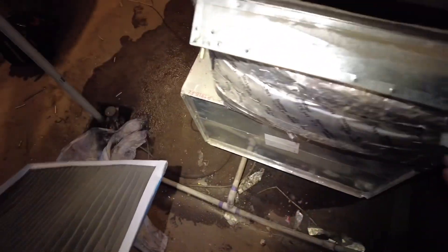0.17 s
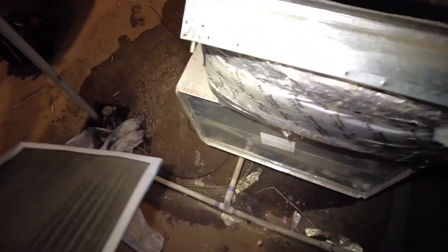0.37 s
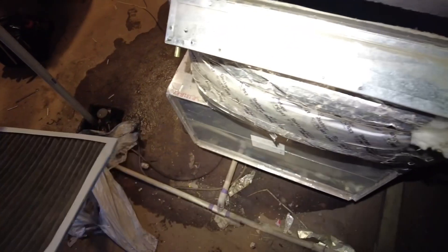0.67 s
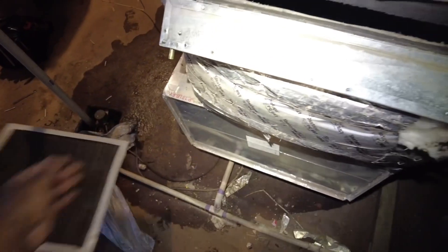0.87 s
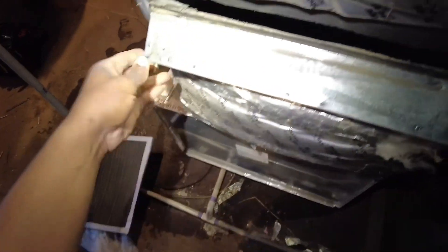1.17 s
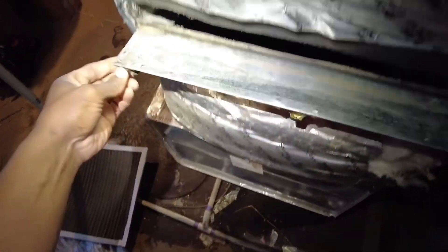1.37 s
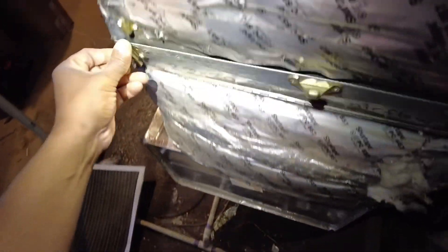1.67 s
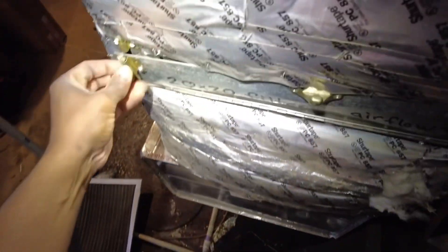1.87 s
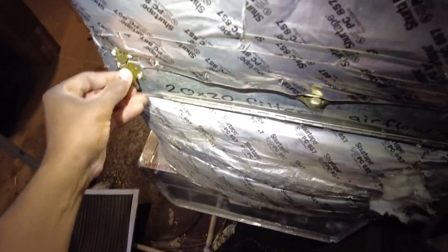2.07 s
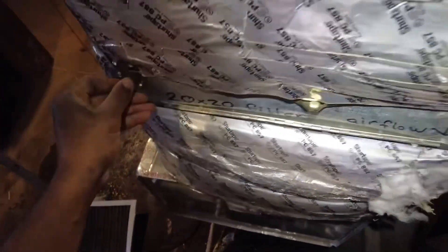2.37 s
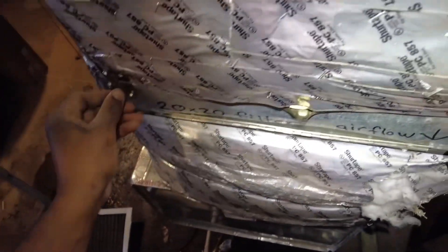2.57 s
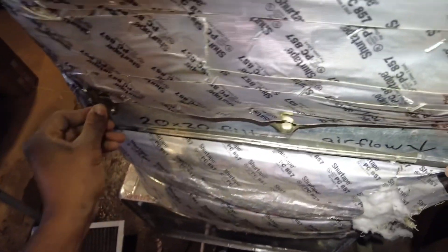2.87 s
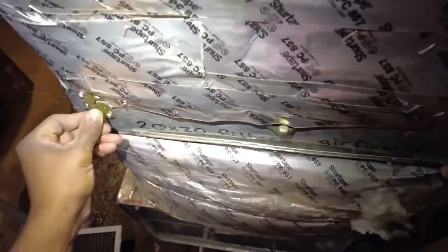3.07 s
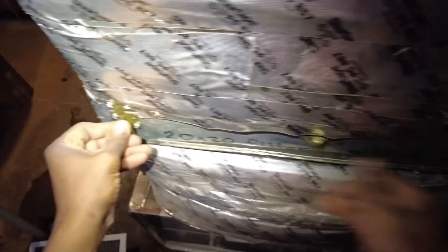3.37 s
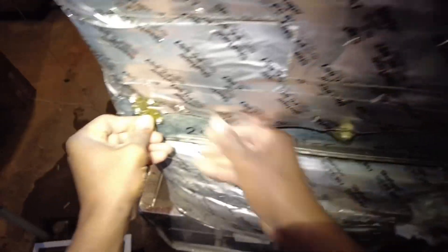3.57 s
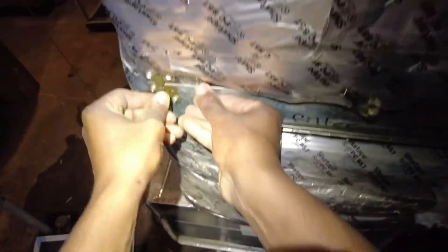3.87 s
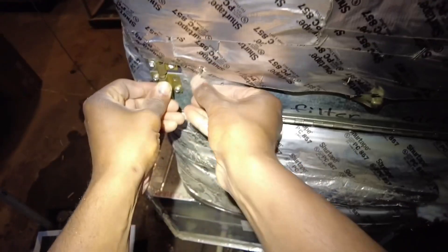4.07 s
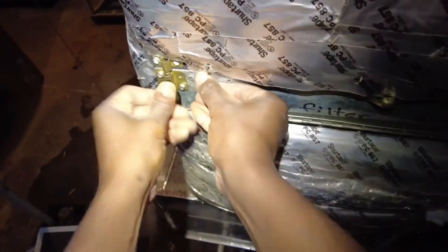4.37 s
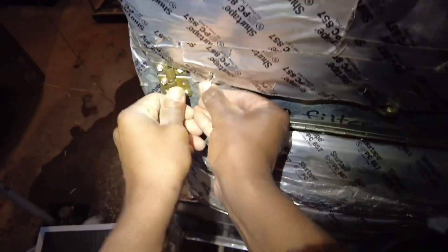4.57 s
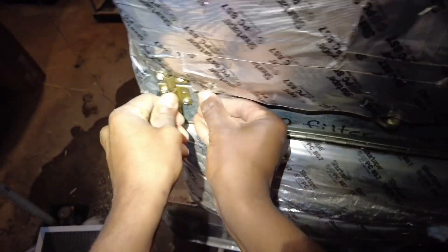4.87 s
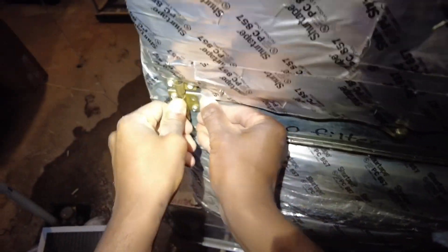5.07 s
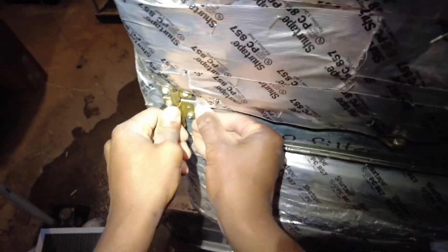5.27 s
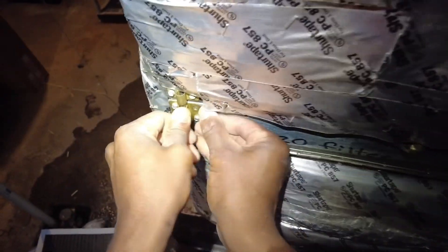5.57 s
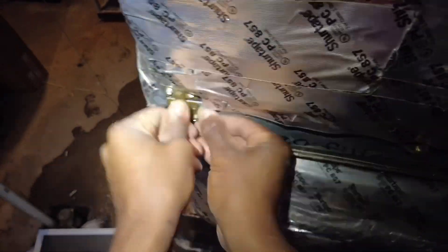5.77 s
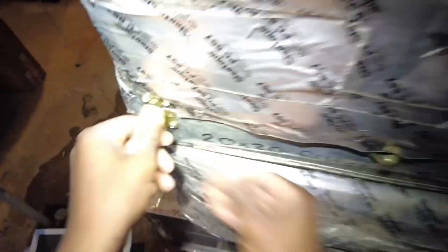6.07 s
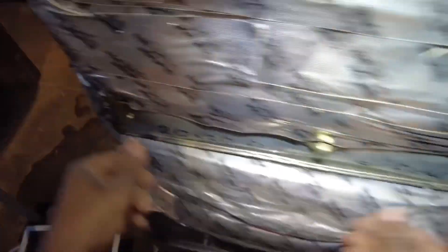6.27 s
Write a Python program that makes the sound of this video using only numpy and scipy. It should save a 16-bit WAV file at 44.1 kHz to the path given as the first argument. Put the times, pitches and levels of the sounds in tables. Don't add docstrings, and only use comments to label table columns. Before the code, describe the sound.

Close stereo pickup beside an air handler under a house: steady low cabinet drone with ground rumble and a resonant air rush. Thin metal clatters in quick clusters as the door swings, bounces and shuts, and the rush drops away to soft leakage. Then sparse finger rubs, foil crackles and light clicks, a short rough squeak, two hollow panel thumps, and finally a hard bright latch snap with the blower continuing.

```python
import sys
import numpy as np
from scipy import signal
from scipy.fft import rfft, irfft, next_fast_len
from scipy.io import wavfile
from scipy.ndimage import uniform_filter1d, map_coordinates

SR = 44100
rng = np.random.default_rng(int(sys.argv[2]) if len(sys.argv) > 2 else 0)


def unload_audio(sound):
    columns = np.transpose(np.atleast_2d(sound))
    steps = np.round(np.clip(columns, -1, 1) * 32767)
    wavfile.write(sys.argv[1], SR, steps.astype(np.int16))


def gain_from_decibels(decibels):
    exponent = np.asarray(decibels, float) / 20
    return 10 ** exponent


N = 282681

# start_s, share_shut (0 to 1)
DOOR_TRAVEL = [
    (1.2, 0.0),
    (1.34, .3),
    (1.6, 0.53),
    (1.68, 0),
    (1.79, 0.39),
    (1.95, 0.79),
    (2.05, .9),
    (2.3, 0.98),
]
# mode_hz, width_hz
DOOR_MODES = [(1510, 140), (2240, 100), (2990, 250), (4090, 90), (4410, 130), (4970, 82), (6240, 220),
              (7270, 100), (8050, 88), (9240, 120), (11300, 220)]


def unit(x):
    return x / np.sqrt(np.mean(x ** 2) + 1e-20)


def along(points, hz):
    f, v = np.transpose(points)
    return np.interp(np.log(hz + 1), np.log(f + 1), v)


def law(points, control):
    return np.interp(control, *np.transpose(points))


def curves(rows, silent=None):
    s, *cols = np.transpose(rows)
    return [np.interp(np.arange(N) / SR, s, c, silent, silent) for c in cols]


def wobble(rate):
    knots = rng.standard_normal(int(N * rate / SR) + 4)
    return map_coordinates(knots, [np.arange(N) * rate / SR])


def filtered(x, response):
    m = next_fast_len(x.shape[-1] + 8192)
    return irfft(rfft(x, m) * response(np.fft.rfftfreq(m, 1 / SR)), m)[..., :x.shape[-1]]


def band(f, hz, width_hz):
    return 1j * f * width_hz / (hz * hz - f * f + 1j * f * width_hz)


def lagged(x, lag_s):
    return filtered(x, lambda hz: np.exp(1j * np.pi * np.outer([1, -1], hz) * lag_s))


def rush(spectrum, patchy_db, peaks=(), grain_db=0, spread=1):
    # band_hz, likeness (0 to 1)
    port_likeness = [(60, 0.97), (150, 0.99), (380, 0.76), (1000, 0.25), (1500, 0.8), (2600, 0.28),
                     (5980, 0.051), (15000, 0.13)]
    grains = rng.standard_normal((2, N)) * gain_from_decibels(grain_db * wobble(900))
    z = signal.stft(grains, nperseg=512)[2]
    field = uniform_filter1d(rng.standard_normal(z.shape[1:]), size=6, axis=0)
    field = uniform_filter1d(field, size=10, axis=1)
    pair = signal.istft(z * gain_from_decibels(patchy_db * unit(field)), nperseg=512)[1][:, :N]

    def response(hz):
        turn = spread * np.arccos(np.clip(along(port_likeness, hz), -1, 1)) / 2
        humps_db = sum(db / (1 + (2 * (hz - c) / w) ** 2) for c, w, db in peaks)
        return gain_from_decibels(along(spectrum, hz) + humps_db) * [np.cos(turn), np.sin(turn)]

    mid, side = filtered(pair, response)
    return unit(np.array([mid + side, mid - side]))


def contacts():
    # start_s, peak_db, ring_hz, brightness_db
    door_rattles = [(0.5174, -42, 3190, -38), (0.519, -45, 4300, -36), (0.595, -42, 1550, -20),
                    (0.62, -36.5, 5200, -25), (0.7971, -35, 4700, -29), (0.798, -40, 1550, -30),
                    (0.8616, -29, 4900, -24), (0.9393, -26, 5000, -24), (0.9407, -30, 1780, -26),
                    (0.9412, -33, 2900, -30), (1.069, -46, 6500, -8), (1.1143, -42, 7000, -10),
                    (1.1196, -22, 3450, -34), (1.1235, -31, 2000, -30), (1.1783, -23, 3020, -34),
                    (1.1785, -27, 6400, -24), (1.181, -27, 4400, -30), (1.192, -33, 3000, -30),
                    (1.2895, -38.5, 2580, -22), (1.315, -36, 1500, -26), (1.3308, -32, 5280, -16),
                    (1.3438, -30, 5590, -18), (1.349, -34, 5800, -16), (1.3655, -27, 4500, -13),
                    (1.372, -31, 4300, -10), (1.4187, -28, 4250, -10), (1.4508, -31, 7300, -9),
                    (1.5102, -37, 3060, -20), (1.5292, -27, 4500, -9), (1.5333, -18, 3200, -9),
                    (1.537, -25, 8500, -6), (1.5385, -24, 4400, -20), (1.545, -30, 1550, -30),
                    (1.5828, -23, 4190, -14), (1.594, -30, 2900, -24), (1.6044, -29, 2900, -14),
                    (1.612, -35, 4300, -20), (1.7079, -41, 4050, -30), (1.7207, -24, 3980, -23),
                    (1.7405, -28.5, 6000, -25), (1.821, -47, 6500, -16), (1.85, -50, 9500, -8),
                    (1.924, -46, 5700, -18), (1.938, -39.5, 4500, -25)]
    # start_s, peak_db, brightness_db
    foil_crinkles = [(2.2456, -51, -21), (2.329, -51, -21), (2.39, -50, -21), (2.5519, -57.5, -35),
                     (2.7556, -46, -20), (2.7853, -45, -21), (2.906, -55, -30), (3.55, -48, -15),
                     (3.5594, -60, -20), (3.6379, -49.5, -21), (4.2797, -51, -20), (4.353, -47, -12),
                     (5.465, -44, -20), (6.1097, -55, -29), (6.2046, -44, -13), (6.2383, -48, -7),
                     (6.3494, -50.5, -5)]
    # start_s, peak_db, ring_hz, brightness_db
    nail_taps = [(2.1738, -41, 4600, -8), (2.175, -47.5, 1670, -28), (3.068, -37, 2590, -32),
                 (3.0682, -44, 1090, -30), (3.0684, -50, 7800, -24), (3.0686, -50, 5700, -30),
                 (2.907, -48, 2500, -30), (3.15, -45, 2900, -50), (3.1743, -48, 1900, -44),
                 (3.1994, -29, 3550, -16), (3.2005, -32, 7400, -10), (3.274, -49, 2600, -40),
                 (4.393, -36.5, 3600, -24), (4.4575, -40, 4300, -30), (4.464, -38, 4200, -30),
                 (4.4645, -42, 1300, -30), (4.4724, -34, 3520, -13), (4.477, -42, 9000, -10),
                 (4.6, -37.5, 2640, -14), (4.6145, -35, 3230, -16), (4.638, -40, 2600, -50),
                 (4.639, -47, 1200, -50), (4.6956, -43, 10800, -24), (4.7226, -30.5, 2830, -13),
                 (4.723, -35, 1600, -24), (4.7245, -42, 1150, -30), (4.7235, -40, 11000, -10),
                 (4.724, -34, 4270, -12), (4.9352, -38, 2750, -20), (4.9372, -36, 5500, -18),
                 (4.943, -42, 4300, -18), (4.94, -42, 1250, -30), (4.955, -47, 1300, -30),
                 (4.974, -46, 4000, -16), (4.731, -44, 4200, -16), (5.8225, -31, 5000, -10),
                 (5.838, -38, 6000, -14), (5.459, -49, 3500, -16), (5.364, -50, 9000, -14)]
    first_blow = [6.1, 1.3, 5.6]
    # level_db of ring, fizz, body
    scatter_db = [
        [-1.5],
        [-2],
        [-8],
    ]

    crinkle_hz = 2900
    ticks = [(*row, -7.5 - 0.44 * (row[1] + 30), 0.036) for row in door_rattles]
    ticks += [(s, db, crinkle_hz, bright_db, -8, 0.035) for s, db, bright_db in foil_crinkles]
    ticks += [(*row, -5 - 9.5 * np.log2(row[2] / crinkle_hz), 0.019) for row in nail_taps]

    size = 4096
    out, t, f = np.zeros((2, N + SR)), np.arange(size) / SR, np.fft.rfftfreq(size, 1 / SR)
    fizz, middle = band(f, 11500, 9000) ** 2, band(f, 5340, 5100) ** 2
    body = band(f, 1524, 990) ** 2 + 0.84 * band(f, 995, 520) ** 2
    modes_hz, widths_hz = np.transpose(DOOR_MODES)[..., None]
    for s, db, ring_hz, bright_db, body_db, t60_s in ticks:
        envelope = gain_from_decibels(-60 * t / np.clip(t60_s, .005, .06)) * (1 - np.exp(-t / 0.00069))
        burst = rng.standard_normal((2, 3, size)) * envelope
        burst[0, :, 8] += first_blow
        reach_db = -3 - 11 * np.abs(np.log2(modes_hz / ring_hz)) + rng.normal(0, 3, modes_hz.shape)
        ring = band(f, ring_hz, 0.35 * ring_hz) ** 2
        ring = ring + (gain_from_decibels(reach_db) * band(f, modes_hz, widths_hz)).sum(axis=0)
        ring = ring + gain_from_decibels(0.59 * bright_db - 3) * middle
        colours = irfft(rfft(burst) * [ring, fizz, body], size)
        levels = gain_from_decibels([db - 1, db - 2 + bright_db, db - 2.5 + body_db]) / np.abs(colours).max(axis=(0, 2))
        colours[1] *= gain_from_decibels(scatter_db)
        out[:, round(s * SR):][:, :size] += levels @ colours
    return out[:, :N]


def thuds():
    # start_s, peak_db, pitch_hz, t60_s, way (out 1, in -1)
    knocks_and_pops = [(1.29, -32, 288, 0.096, 1), (1.533, -34.5, 270, 0.092, -1), (1.74, -41, 260, .08, 1),
                       (4.462, -38.5, 557, 0.064, 1), (4.5994, -13.5, 246.5, 0.065, 1),
                       (4.7265, -33, 487, 0.052, 1), (4.954, -33.5, 478, 0.052, 1), (4.622, -30, 300, .04, 1),
                       (4.934, -7, 249.4, 0.031, -1), (4.9345, -25, 560, .03, -1), (4.6, -30, 480, .03, 1),
                       (5.8096, -27, 247, .05, -1), (5.8152, -14, 268, 0.014, 1), (5.816, -39, 535, 0.075, 1),
                       (3.068, -40, 596, 0.033, 1), (6.205, -40.5, 700, 0.028, 1)]
    out, t = np.zeros(N + SR), np.arange(SR // 4) / SR
    for s, db, hz, t60_s, way in knocks_and_pops:
        over_db = np.interp(t60_s, [0.036, .066], [-2.5, -10])
        low = np.sin(2 * np.pi * hz * t) * gain_from_decibels(-60 * t / t60_s)
        overtones = np.sin(2 * np.pi * 1.51 * hz * t) + .25 * np.sin(2 * np.pi * 2.26 * hz * t)
        high = gain_from_decibels(over_db - 60 * t / (0.71 * t60_s)) * overtones
        soft_start = (1 - np.exp(-t / 0.0011)) ** 2
        out[round(s * SR):][:len(t)] += np.sign(way) * gain_from_decibels(db + 5) * (low + high) * soft_start
    return out[:N]


def squeak():
    # start_s, pitch_hz, level_db
    glide = [
        (4.432, 3950, -66),
        (4.445, 3720, -43),
        (4.455, 3560, -28.5),
        (4.464, 3500, -34),
        (4.47, 3560, -54),
        (4.5, 3550, -57),
        (4.53, 3550, -64),
        (4.56, 3550, -76),
    ]
    # multiple, level_db
    overtones = [(1, -1), (2, -12), (3, -19), (4, -24)]
    hz, db = curves(glide)
    turn = 2 * np.pi * np.cumsum(hz * (1 + .018 * wobble(500))) / SR
    sounding = curves(glide, silent=0)[0] > 0
    whistle = 0
    for k, level_db in overtones:
        softer_db = 1.2 * (k - 1) * np.minimum(db + 45, 0)
        whistle = whistle + gain_from_decibels(level_db + softer_db) * np.sin(k * turn)
    return sounding * gain_from_decibels(db + 1.8 * wobble(370)) * whistle


def snap():
    # start_s, peak_db
    release_s, peak_db = (5.8139, -5.5)
    # after_release_s, level_db
    tongue_blows = [
        (.00045, -2),
        (.00095, 0),
        (.0013, -7),
        (.0016, -9),
        (.0019, -9),
        (.0026, -13),
        (.004, -12),
    ]
    # centre_hz, width_hz, level_db
    brass_modes = [(1560, 220, 12), (2910, 650, 5), (4500, 1000, 7), (6100, 800, 1), (7900, 1400, -1),
                   (10200, 1900, 0), (12400, 1800, 1), (14800, 1800, 2)]
    out, t = np.zeros(N + SR), np.arange(SR // 8) / SR
    envelope = (1 - np.exp(-t / 0.00045)) / (1 + (t / 0.0033) ** 4)
    chatter = rng.standard_normal(len(t)) * envelope * gain_from_decibels(-17)
    for after_s, db in tongue_blows:
        chatter[round(after_s * SR)] -= gain_from_decibels(db)
    ring = filtered(chatter, lambda f: sum(gain_from_decibels(db) * band(f, hz, w) for hz, w, db in brass_modes))
    out[round(release_s * SR):][:len(t)] = gain_from_decibels(peak_db) * ring / np.abs(ring).max()
    return out[:N]


def fingers():
    # start_s, end_s, foil_rustle_db, panel_scrape_db
    strokes = [(0.486, 0.722, -69, -58), (1.49, 1.53, -55, -50), (1.118, 1.19, -44.5, -45),
               (1.14, 1.234, -41.5, -42), (1.28, 1.36, -55, -44), (1.315, 1.4, -49, -44.5),
               (1.36, 1.43, -54, -54), (1.41, 1.535, -53, -55), (1.574, 1.635, -46, -41.5),
               (1.716, 1.783, -50, -40.5), (1.9, 1.97, -71, -61), (2.17, 2.43, -67, -74),
               (3.53, 3.587, -67, -76), (3.588, 3.746, -62, -65), (3.707, 3.845, -61, -64),
               (3.81, 4.133, -70.5, -70.5), (4.26, 4.347, -65.5, -64), (4.594, 4.631, -54, -53),
               (6.053, 6.277, -65.5, -62.5)]
    # start_s, end_s, foil_rustle_db, panel_scrape_db
    skids = [
        (1.111, 1.19, -49, -44),
        (1.19, 1.36, -50, -58),
        (1.524, 1.59, -38.5, -40),
        (1.62, 1.74, -66, -64),
        (3.195, 3.275, -64, -62),
        (4.446, 4.52, -46, -50),
        (4.72, 4.79, -60, -62),
        (4.93, 5.06, -57, -54),
        (5.813, 5.95, -50, -43),
    ]
    # start_s, end_s, foil_rustle_db, panel_scrape_db
    pushes = [
        (1.04, 1.134, -58.5, -63),
        (2.94, 3.066, -70, -62),
        (5.775, 5.817, -59, -54),
    ]
    # band_hz, level_db per Hz
    foil_spectrum = [(2060, -29), (3500, -11), (6070, -1.5), (7370, -6.5), (7940, -2.5), (8560, -4.5),
                     (10500, -7.5), (15600, -13)]
    # band_hz, level_db per Hz
    panel_spectrum = [(400, -30), (600, -7.5), (1000, -9), (1200, -5.5), (1550, -3), (2300, -7), (3000, -5),
                      (3600, -7), (4400, -5), (6000, -9), (8000, -17), (12000, -45)]

    t, foil, panel = np.arange(N) / SR, np.zeros(N), np.zeros(N)
    kinds = [(strokes, 0.45, 1.3), (skids, 0.1, 2.3), (pushes, 0.87, 1.1)]
    for rows, rise, fade in kinds:
        for start, end, foil_db, panel_db in rows:
            crest = start + rise * (end - start)
            up, down = np.interp(t, [start, crest], [0, 1]), np.interp(t, [crest, end], [1, 0])
            swell = up * (2 - up) * down ** fade
            foil += gain_from_decibels(foil_db) * swell
            panel += gain_from_decibels(panel_db) * swell
    clumps, patchy_db = gain_from_decibels(1.2 * wobble(60) + 1.5 * wobble(220)), 2.2
    door_ring = [(hz, width_hz, 2.5) for hz, width_hz in DOOR_MODES]
    rustle = foil * rush(foil_spectrum, patchy_db, grain_db=2.0, spread=0.95)
    scrape = panel * rush(panel_spectrum, patchy_db, peaks=door_ring, grain_db=2.5, spread=0.83)
    return clumps * (rustle + scrape)


def air():
    # band_hz, level_db per Hz
    slot_spectrum = [(180, -28), (300, 3.5), (331, 5), (360, -13), (391, -11.5), (469, -0.5), (723, -12.5),
                     (812, -10), (990, -12), (1740, -16.5), (15800, -42)]
    # band_hz, level_db per Hz
    gap_spectrum = [(900, -43), (1150, -24), (1350, -4), (1550, -8), (1800, 2), (2050, -3.5), (2400, -12.5),
                    (2900, 0), (3150, -5.5), (3550, -19), (4200, -7), (5000, -18), (6000, -18.5),
                    (12000, -39)]
    # band_hz, level_db per Hz
    seam_spectrum = [(350, -46), (600, -3.5), (800, -5.5), (1050, -12), (1250, -15), (1700, -46)]
    # band_hz, level_db per Hz
    leak_spectrum = [(700, -62), (1050, -29), (1300, -18), (2300, -21), (3300, -22.5), (5000, -26.5),
                     (7800, -32), (9000, -29), (9800, -36.5), (13000, -38), (15000, -44)]
    # centre_hz, width_hz, level_db
    duct_modes = [(464, 57, 5), (813, 66, 8), (1274, 120, 6.5), (1710, 150, 2.5), (2920, 370, 4),
                  (4250, 170, 4), (6200, 280, 3.5)]
    # share_shut, level_db
    choke = [(0, 0), (.3, -.5), (.55, -4), (.8, -25), (1, -32)]
    # share_shut, level_db
    sing = [(0, -61), (.3, -49.5), (.8, -54), (.9, -67), (1, -85)]

    t, shut, patchy_db = np.arange(N) / SR, np.clip(curves(DOOR_TRAVEL)[0], 0, 1), 1.2
    nearest_s = 1.22
    near_db = -45 - np.maximum(4.5 * (nearest_s - t), 10.5 * (t - nearest_s))
    slot = gain_from_decibels(near_db + law(choke, shut)) * rush(slot_spectrum, patchy_db, peaks=duct_modes)
    gap = gain_from_decibels(law(sing, shut)) * rush(gap_spectrum, patchy_db)
    pressed = np.exp(-((t - 2.03) / .22) ** 2)
    seam_open_db, seam_shut_db = -61, -64
    seam_db = seam_open_db + shut * (seam_shut_db - seam_open_db) - 6.5 * pressed + 1.5 * wobble(2.48)
    seam = gain_from_decibels(seam_db) * rush(seam_spectrum, patchy_db)
    leaks = gain_from_decibels(-63.3 + 0.56 * wobble(4.13)) * rush(leak_spectrum, patchy_db, peaks=duct_modes[2:])
    return slot + gap + seam + leaks


def blower():
    # band_hz, level_db per Hz
    cabinet_spectrum = [(36, -41.5), (62, -14.5), (102, 2), (121, -6.5), (141, -12.5), (156, -22.5),
                        (170, -10), (190, -8.5), (234, -12), (268, -25), (301, -23), (376, -29.5),
                        (438, -25), (620, -37), (810, -64), (1360, -120)]
    # band_hz, level_db per Hz
    ground_spectrum = [(8.8, -31), (15, 0), (43, 7.5), (65, -1.5), (75, -5.5), (98, -40), (160, -120)]
    # start_s, level_db
    turbulence = [(0.0, -32.5), (0.4, -31), (0.9, -33.5), (1.6, -31.5), (1.85, -35.5), (2.15, -35),
                  (2.8, -33), (3.18, -32.5), (3.6, -34.5), (4.02, -32.5), (4.39, -34), (4.9, -31.5),
                  (5.14, -33), (5.84, -32), (6.41, -33)]
    hum_db, shut = curves(turbulence)[0], curves(DOOR_TRAVEL)[0]
    hum = gain_from_decibels(hum_db + 0.89 * wobble(7)) * rush(cabinet_spectrum, patchy_db=.5)
    rumble_db = -41 + 5 * (1 - shut) + 1.3 * wobble(4.54)
    return hum + gain_from_decibels(rumble_db) * rush(ground_spectrum, patchy_db=0.0)


def crawl_space(x):
    # band_hz, t60_s
    space_decay = [(500, .05), (1800, 0.079), (3500, 0.12), (7000, .18), (14000, 0.1)]
    hz, t, z = signal.stft(rng.standard_normal((2, SR // 3)), SR, nperseg=256)
    fading = z * gain_from_decibels(-60 * t / along(space_decay, hz)[:, None])
    tail = signal.istft(fading, SR, nperseg=256)[1]
    late = np.pad(x, (90, 0))[None]
    return signal.fftconvolve(late, tail / np.linalg.norm(tail[0]), axes=1)[:, :N]


def scene():
    (ticks, unlike), latch = contacts(), squeak() + snap()
    direct = ticks + np.outer([1, -1], unlike)
    direct = direct + lagged(latch, .000022) + lagged(thuds(), .0003)
    echoes = gain_from_decibels(-9) * crawl_space(ticks + .75 * latch)
    return direct + echoes + fingers() + air() + blower()


def roll_off(x):
    return signal.sosfilt(signal.butter(12, 16430, fs=SR, output="sos"), x)


def record(dry):
    # band_hz, left_minus_right_db
    port_lean = [(30, -2.5), (70, -0.3), (180, 0.0), (550, 1), (1650, 0), (4970, 0), (15000, 0)]
    top_hz = 15750

    def ports(hz):
        balance_db = np.outer([.5, -.5], along(port_lean, hz))
        return gain_from_decibels(balance_db - 30 * np.clip((hz - top_hz) / 300, 0, 3))

    return roll_off(filtered(dry, ports))


dry = scene()
out = record(dry)
unload_audio(out)
```